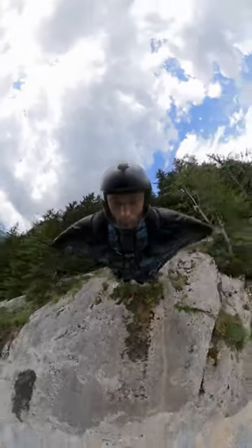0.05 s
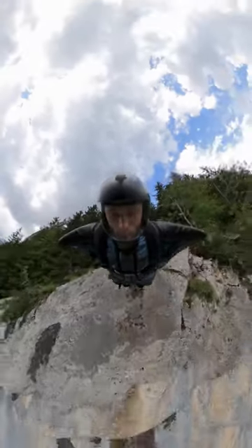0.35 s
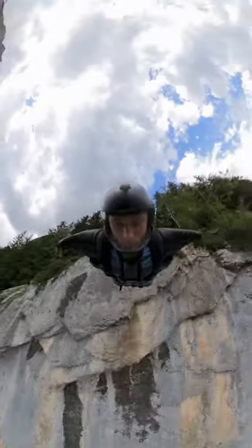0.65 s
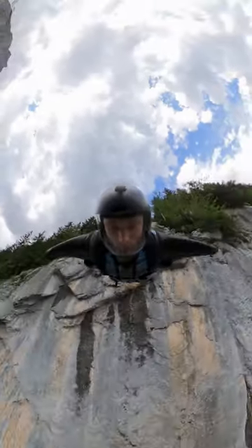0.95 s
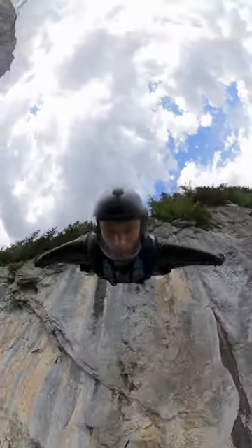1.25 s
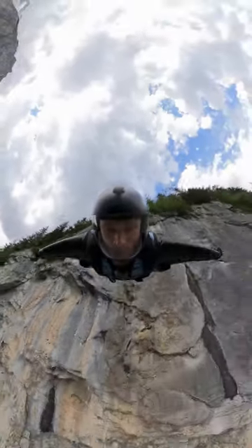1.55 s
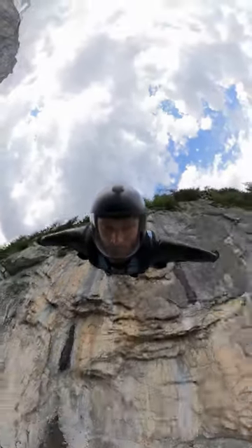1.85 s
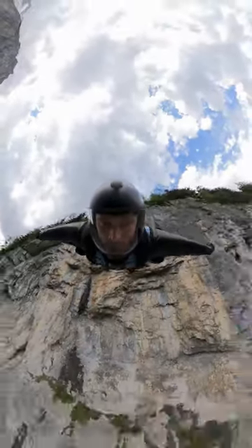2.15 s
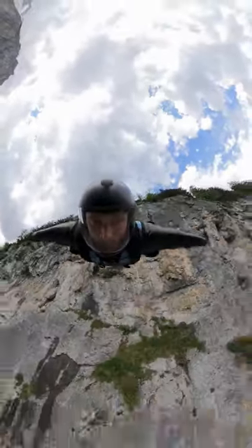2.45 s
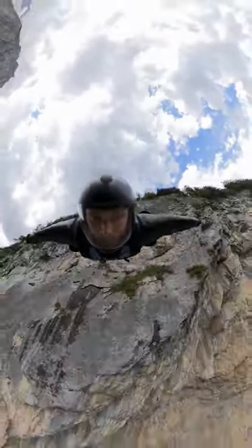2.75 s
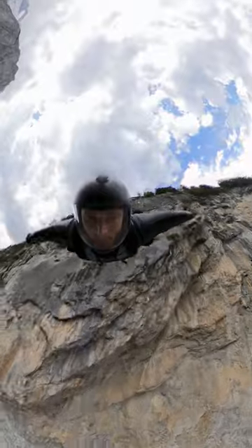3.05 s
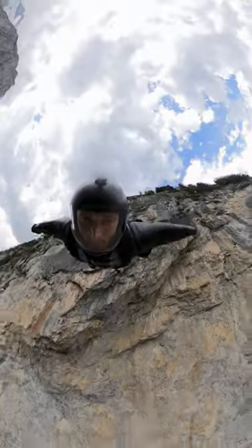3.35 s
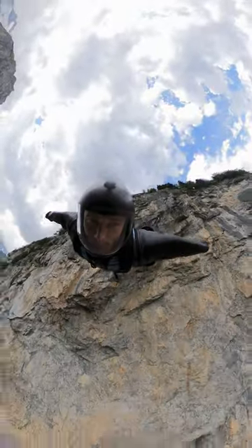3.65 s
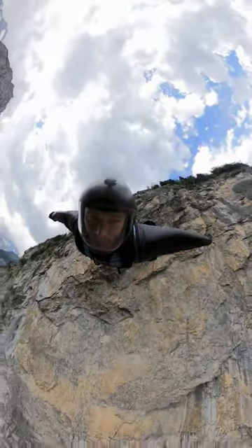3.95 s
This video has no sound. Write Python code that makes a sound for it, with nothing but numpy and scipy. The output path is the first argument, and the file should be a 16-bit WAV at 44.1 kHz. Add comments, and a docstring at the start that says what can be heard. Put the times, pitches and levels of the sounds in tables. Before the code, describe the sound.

Wind buffeting a microphone, building from a low rumble to a gusty roar with rising hiss.

```python
"""Wind on a wingsuit dive.

Air rushes over a camera carried by a flyer who dives from a cliff and gathers speed. The suit
rustles and snaps as it fills. A broad rush and a rising band of hiss grow as the airspeed
climbs. Eddies buffet the microphone with a roar, gusts and a deep, lumpy rumble."""
import sys
import numpy as np
from scipy import signal
from scipy.fft import rfft, irfft
from scipy.io import wavfile
from scipy.ndimage import uniform_filter1d

SR = 44100
rng = np.random.default_rng(int(sys.argv[2]) if len(sys.argv) > 2 else 0)


def persist_wave(psi):
    """Save psi, clipped to +-1, as 16-bit WAV."""
    counts = np.round(np.clip(psi, -1, 1) * 32767).astype(np.int16)
    wavfile.write(sys.argv[1], SR, np.atleast_2d(counts).T)


N = 176400
TIME = np.arange(N) / SR

# Levels are relative within each table; a half-width reaches to 1/e of the peak amplitude.
# very faint, brief, narrow bands of noise (t/s, half-width/s, f/Hz, level/dB)
FAINT_HIGH_TONES = [(.05, .03, 5670, -73), (.195, .028, 5750, -74), (.75, .018, 6000, -72)]
# rustle of the suit (t/s, level/dB)
RUSTLE_LEVEL = [(0, -45), (.09, -47.5), (.22, -49), (.33, -48), (.45, -45), (.53, -45.5), (.62, -44.5),
                (.75, -44), (1.0, -44), (1.3, -48.5), (2, -40.5)]
# swishes of cloth sliding on cloth (t/s, half-width/s, level/dB)
CLOTH_SWISHES = [(.045, 0.13, -63), (.33, 0.088, -65.5), (.44, 0.025, -70), (.62, 0.042, -67),
                 (.99, 0.078, -61), (1.2, 0.088, -62.5)]
# snaps of the fabric (t/s, level/dB)
FABRIC_SNAPS = [(.066, -45), (0.18, -48), (.247, -50), (.365, -45.5), (.416, -46), (0.466, -42),
                (.583, -39.5), (.633, -39), (.694, -40), (.749, -42), (.840, -39.5), (1.122, -43),
                (1.184, -36.5)]
# airflow (t/s, rush level/dB, hiss level/dB)
FLOW_LEVELS = [(1.3, -60.5, -68), (1.5, -61, -72), (1.68, -53.5, -81), (1.83, -51, -61), (1.95, -53.5, -53),
               (2.36, -49, -49), (2.74, -45.5, -46.5), (3.02, -44.5, -45.5), (3.4, -39, -39),
               (3.7, -37, -37), (4, -35.5, -34.5)]
# centre of the hiss, rising with airspeed (t/s, f/Hz)
HISS_GLIDE = [(1.3, 3700), (1.9, 4100), (2.3, 4630), (2.7, 5130), (3.15, 6780), (3.5, 7200), (4, 7760)]
# steep treble roll-off of the airflow (f/Hz, level/dB)
FLOW_ROLLOFF = [(6000, 3), (7400, 1.5), (8000, -3), (8500, -9), (9100, -14.5), (10000, -19), (11200, -20),
                (13000, -26), (15000, -34)]
# gusts that strike the microphone (t/s, half-width/s, level/dB, spectral shift/octaves)
GUST_STRIKES = [(0.257, 0.015, -35, -1), (0.435, 0.017, -32, -0.59), (.762, 0.016, -21, -0.46),
                (0.916, 0.014, -20.5, -0.99), (.94, 0.0045, -15.5, -0.67), (0.963, 0.01, -17, -.2),
                (1.004, .022, -21, -0.062), (1.042, .01, -22.5, 0.13), (1.081, .01, -18, -0.68),
                (1.209, 0.012, -16.5, -0.21), (1.285, 0.019, -17.5, -0.31), (1.387, .018, -21, -.35),
                (1.427, 0.015, -27, 0), (1.477, .009, -18.5, -0.46), (1.605, 0.016, -22, .05),
                (1.669, 0.027, -21.5, 0.058), (1.795, 0.012, -19, -0.26), (1.862, 0.024, -22.5, -.1),
                (1.949, 0.024, -16.5, -.05), (2.001, 0.019, -18.5, 0), (2.059, 0.015, -20.5, .05),
                (2.111, 0.0056, -21.5, 0.21), (2.158, 0.0097, -18.5, -.3), (2.218, 0.02, -18.5, 0.23),
                (2.291, 0.026, -18.5, -0.19), (2.416, .008, -15, -.2), (2.49, 0.014, -21, 0),
                (2.589, 0.026, -20, 0.11), (2.64, 0.015, -18, 0.48), (2.697, .008, -17.5, 0.097),
                (2.746, 0.0092, -14, .3), (2.78, 0.0094, -22.5, 0.36), (2.815, 0.0089, -16.5, 0.44),
                (2.867, 0.0086, -14, -0.42), (2.904, .008, -28, 0.4), (2.941, 0.0076, -12.5, -.05),
                (3.122, 0.0079, -25.5, -.2), (3.645, 0.01, -29, .1)]
# roar between gusts, and deep rumble at the microphone (t/s, level/dB)
ROAR_LEVEL = [(0, -47), (.25, -52), (.7, -45), (.76, -35.5), (.88, -39), (.94, -33), (1.02, -27.5),
              (1.15, -35), (1.35, -33), (1.53, -37), (1.72, -30.5), (1.98, -23.5), (2.15, -29),
              (2.37, -33.5), (2.55, -25.5), (2.8, -28.5), (3.1, -29.5), (3.35, -31.5), (3.6, -29),
              (4, -32.5)]
RUMBLE_LEVEL = [(0, -45.5), (.2, -37.5), (.3, -33), (.66, -29.5), (.8, -20), (1.0, -16), (1.22, -15.5),
                (1.33, -21.5), (1.42, -14.5), (1.53, -21), (1.62, -17), (2.0, -15.5), (2.3, -16),
                (2.38, -20.5), (2.6, -15.5), (3.05, -20), (3.4, -17.5), (3.65, -20.5), (4, -19)]
# spectral density of each source (f/Hz, level/dB)
RUSTLE_SPECTRUM = [(150, 5), (400, 4.5), (850, 1.5), (1300, -3.5), (2000, -6.5), (2800, -14), (3800, -20.5),
                   (4600, -30), (5900, -30.5), (7500, -40), (9000, -53), (15000, -69.5)]
SWISH_SPECTRUM = [(1000, -3.5), (2500, 3.5), (4000, 2), (6000, -4.5), (8000, -14), (10500, -24),
                  (15000, -46)]
SNAP_SPECTRUM = [(300, -8), (1000, -3), (1550, 6.5), (2200, 7), (2900, -1), (3750, 1), (4500, -11),
                 (6400, -14), (8000, -26), (11000, -40), (15000, -58)]
RUSH_SPECTRUM = [(150, -13), (400, 10.5), (800, 5), (1300, 1), (1900, -2), (2900, -1.5), (4500, -6.5),
                 (7000, -14.5), (10000, -8), (15000, -17.5)]
ROAR_SPECTRUM = [(100, -11), (200, -4.5), (280, 4), (400, -8), (520, -5.5), (700, -18.5), (1000, -35.5),
                 (2000, -56.5), (6000, -97.5)]
GUST_SPECTRUM = [(50, -6), (120, 1), (250, 3.5), (380, -4.5), (520, -11.5), (720, -19.5), (1000, -33),
                 (2000, -62), (6000, -95.5)]
RUMBLE_SPECTRUM = [(8, -17.5), (25, 2), (45, 1), (75, 1.5), (110, -1.5), (160, -3), (230, -9), (340, -19.5),
                   (600, -46), (1500, -102.5)]

UNSHIFTED_AT_S = 2.07  # the upward drift of the roar and rumble spectra passes through zero here


def amp(db):
    """Amplitude ratio: a factor of ten for every 20 dB."""
    return 10 ** (np.asarray(db) / 20)


def unit(x):
    """Normalisation to an rms of 1."""
    return x / np.sqrt(np.mean(x ** 2) + 1e-20)


def along(table, column=1):
    """Linear interpolation of one column of a time table at every sample."""
    rows = np.array(table, float)
    return np.interp(TIME, rows[:, 0], rows[:, column])


def swells(rows):
    """Superposition of Gaussian envelopes from rows (t/s, half-width/s, level/dB)."""
    return sum(amp(db) * np.exp(-((TIME - at) / width) ** 2) for at, width, db in rows)


def gain_at(spectrum, hz):
    """Magnitude response of a spectrum, interpolated in log frequency."""
    f, db = np.transpose(spectrum)
    return amp(np.interp(np.log(hz + 1), np.log(f), db))


def colour(x, spectrum):
    """Filtering by multiplication in the frequency domain."""
    return irfft(rfft(x, 2 * N) * gain_at(spectrum, np.fft.rfftfreq(2 * N, 1 / SR)))[:N]


def below(x, hz):
    """Zero-phase low-pass filtering."""
    return signal.sosfiltfilt(signal.butter(2, hz, fs=SR, output="sos"), x)


def noise(spectrum):
    """Stationary Gaussian noise with a given spectrum."""
    return unit(colour(rng.standard_normal(N), spectrum))


def moving_noise(shape, control, size=512):
    """Time-varying filtering: noise of constant power whose spectrum is shape(hz, control)."""
    frames = dict(nperseg=size, noverlap=size - size // 4)
    hz, t, spectra = signal.stft(rng.standard_normal(N), SR, **frames)
    gain = shape(hz[:, None], np.interp(t, TIME, control))
    gain = gain / np.sqrt((gain ** 2).sum(0))
    return unit(signal.istft(spectra * gain, **frames)[1][:N])


def shifted_noise(spectrum, octaves, size=1024):
    """Frequency scaling: noise whose whole spectrum slides by a varying number of octaves."""
    return moving_noise(lambda hz, shift: gain_at(spectrum, hz / 2 ** shift), octaves, size)


def eddies(slow_hz=10, fast_hz=70):
    """Turbulence: a random fluctuation in which slow eddies are stronger than fast ones."""
    hz = np.fft.rfftfreq(N, 1 / SR)
    weight = hz / (hz ** 2 + slow_hz ** 2) ** (3 / 4) / (1 + (hz / fast_hz) ** 2)
    return unit(irfft(rfft(rng.standard_normal(N)) * weight, N))


def faint_high_tones(half_band_hz=174):
    """Narrow-band noise: three very faint, brief tones near 6 kHz, sines modulated by slow noise."""
    out = np.zeros(N)
    for at, width, hz, db in FAINT_HIGH_TONES:
        modulation = below(rng.standard_normal(2 * N), half_band_hz)[N // 2:][:N]
        out += swells([(at, width, db)]) * unit(modulation * np.sin(2 * np.pi * hz * TIME))
    return out


def suit_rustle(swing_db=1.1):
    """Cloth rustles and slides on cloth; its flutter modulates the amplitude of the noise."""
    rustle = noise(RUSTLE_SPECTRUM) * amp(along(RUSTLE_LEVEL))
    swishes = noise(SWISH_SPECTRUM) * swells(CLOTH_SWISHES)
    return (rustle + swishes) * amp(swing_db * eddies())


def crack(rise_s=0.0014, fall_s=0.0018, tail_s=0.016, tail_db=-10.5, smoothing_hz=350):
    """A broadband transient: noise with a fast exponential decay and a short, weaker tail."""
    t = np.arange(4096) / SR
    decay = np.exp(-t / fall_s) + amp(tail_db) * np.exp(-t / tail_s)
    envelope = np.minimum(t / rise_s, 1) * decay
    spectrum = rfft(envelope * rng.standard_normal(len(t)))
    power = uniform_filter1d(abs(spectrum) ** 2, int(smoothing_hz * len(t) / SR))
    burst = irfft(spectrum / np.sqrt(power))  # whitening gives every crack the same colour
    burst *= 1 - t / t[-1]
    return burst * np.linalg.norm(envelope) / np.linalg.norm(burst)


def fabric_snaps():
    """Impulsive excitation: the fabric cracks each time it pulls taut."""
    cracks = np.zeros(N)
    for at, db in FABRIC_SNAPS:
        burst, start = amp(db) * crack(), round(at * SR)
        cracks[start:start + len(burst)] += burst
    power_gain = np.mean(gain_at(SNAP_SPECTRUM, np.fft.rfftfreq(N, 1 / SR)) ** 2)
    return colour(cracks, SNAP_SPECTRUM) / np.sqrt(power_gain)


def hiss_band(hz, centre_hz, sigma_oct=0.29, floor_db=-10):
    """Band-pass response: a Gaussian in log frequency on a flat floor."""
    return np.exp(-0.5 * (np.log2((hz + 1) / centre_hz) / sigma_oct) ** 2) + amp(floor_db)


def wing_flutter(rush, rate_hz=44, wander=0.44, depth_db=1, below_hz=2700):
    """Amplitude modulation: the wings beat unevenly in the flow and shake the lower part of the rush."""
    beat = np.sin(2 * np.pi * np.cumsum(rate_hz * (1 + wander * eddies())) / SR)
    return rush + below(rush, below_hz) * (amp(depth_db * beat) - 1)


def airflow(swirl, rush_db=4.5, hiss_db=-3, swing_db=0.5, onset_db_per_s=23.5):
    """Aerodynamic noise grows with airspeed: a broad rush, and a hiss that climbs in frequency."""
    hiss = moving_noise(hiss_band, along(HISS_GLIDE)) * amp(along(FLOW_LEVELS, column=2) + hiss_db)
    rush = wing_flutter(noise(RUSH_SPECTRUM) * amp(along(FLOW_LEVELS) + rush_db))
    fade_in_db = onset_db_per_s * np.minimum(TIME - FLOW_LEVELS[0][0], 0)
    return colour((rush + hiss) * amp(swing_db * swirl + fade_in_db), FLOW_ROLLOFF)


def eddy_roar(swirl, gust_envelope, rise_oct_per_s=0.37, rise_until_s=2.13, swing_oct=0.23,
              gain_db=1, swing_db=-1.5, swept_share=0.38):
    """Smaller eddies sound higher: the roar brightens as speed grows, and wavers with the turbulence."""
    drift_oct = rise_oct_per_s * (np.minimum(TIME, rise_until_s) - UNSHIFTED_AT_S)
    level_db = along(ROAR_LEVEL)
    roar = shifted_noise(ROAR_SPECTRUM, drift_oct + swing_oct * swirl)
    roar *= amp(level_db + gain_db + swing_db * swirl)
    gust_dominance = gust_envelope / np.hypot(gust_envelope, amp(level_db))
    return roar * (1 - swept_share * gust_dominance)  # a gust sweeps some small eddies aside


def gusts(envelope, smoothing_s=0.0076):
    """Pressure pulses: separate puffs strike the microphone, each with its own force and brightness."""
    air = shifted_noise(GUST_SPECTRUM, along(GUST_STRIKES, column=3))
    power = uniform_filter1d(abs(signal.hilbert(air)) ** 2, int(smoothing_s * SR))
    even_air = unit(air / np.sqrt(abs(power) + 1e-9))
    return even_air * envelope


def buffeting_rumble(rise_oct_per_s=0.1, thin_from_s=3.6, thin_db_per_s=2, thin_below_hz=160):
    """Turbulent pressure on the microphone gives a deep rumble, whose bass thins at full speed."""
    rumble = shifted_noise(RUMBLE_SPECTRUM, rise_oct_per_s * (TIME - UNSHIFTED_AT_S), size=4096)
    bass_gain = amp(-thin_db_per_s * np.maximum(TIME - thin_from_s, 0))
    rumble += below(rumble, thin_below_hz) * (bass_gain - 1)
    return rumble * amp(along(RUMBLE_LEVEL))


def scene():
    """Superposition of all sources; the same turbulence modulates the roar and the airflow."""
    swirl = unit(np.tanh(eddies()))  # extremes rounded off
    gust_envelope = swells([row[:3] for row in GUST_STRIKES])
    wind = eddy_roar(swirl, gust_envelope) + buffeting_rumble() + airflow(swirl) + gusts(gust_envelope)
    return (wind + suit_rustle() + fabric_snaps() + faint_high_tones())[None]


def record(dry, bass_hz=1500, threshold_db=-8.5, window_s=0.015, knee=0.2, headroom=0.35, top_hz=15000):
    """Limiting and soft clipping hold the bass down and round its peaks; a low-pass limits the band."""
    bass = below(dry[0], bass_hz)
    window = np.hanning(int(window_s * SR))
    power = signal.oaconvolve(bass ** 2, window / window.sum(), "same")
    excess_db = np.maximum(10 * np.log10(abs(power) + 1e-12) - threshold_db, 0)
    held = bass * amp(-7 / 3 * excess_db)  # the cut exceeds the excess, so loud bass ducks
    overshoot = np.maximum(abs(held) - knee, 0)
    rounded = np.clip(held, -knee, knee) + np.sign(held) * headroom * np.tanh(overshoot / headroom)
    limited = dry[0] + below(rounded - bass, bass_hz)
    low_pass = signal.firwin(511, top_hz, window=("kaiser", 9), fs=SR)
    return signal.oaconvolve(limited, low_pass, "same")[None]


dry = scene()
out = record(dry)
persist_wave(out)
```